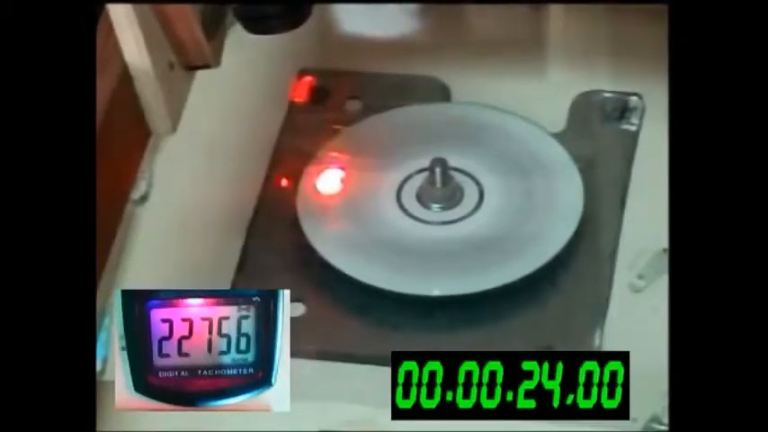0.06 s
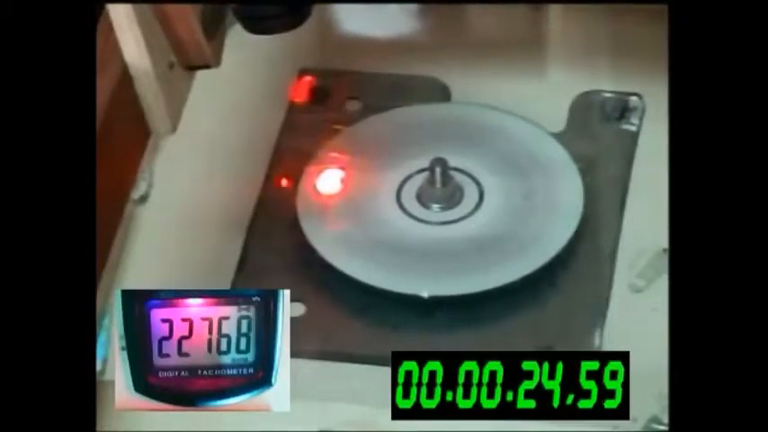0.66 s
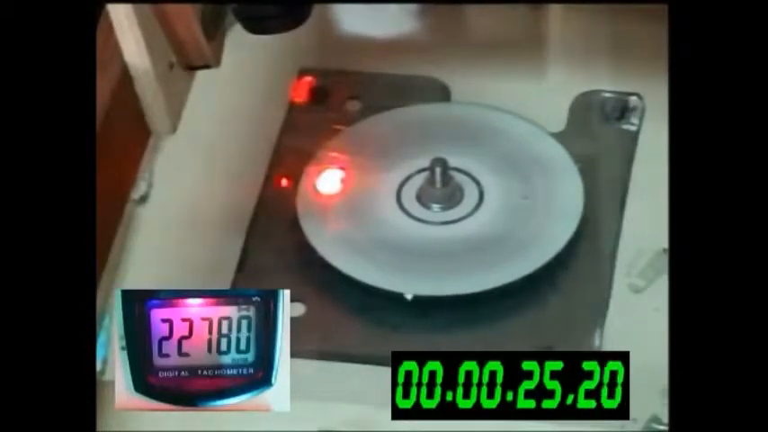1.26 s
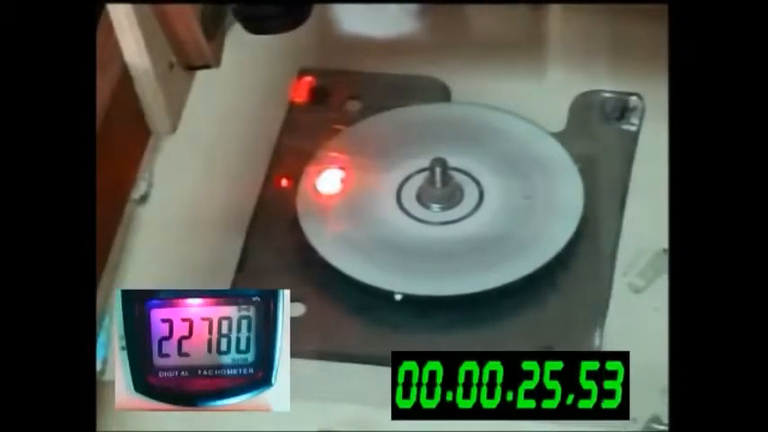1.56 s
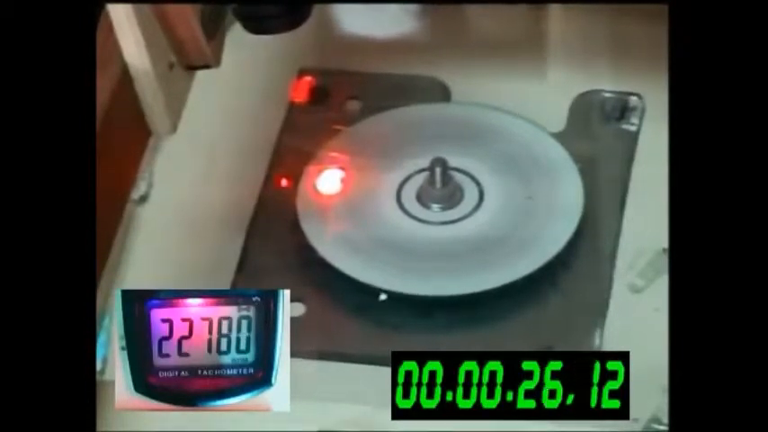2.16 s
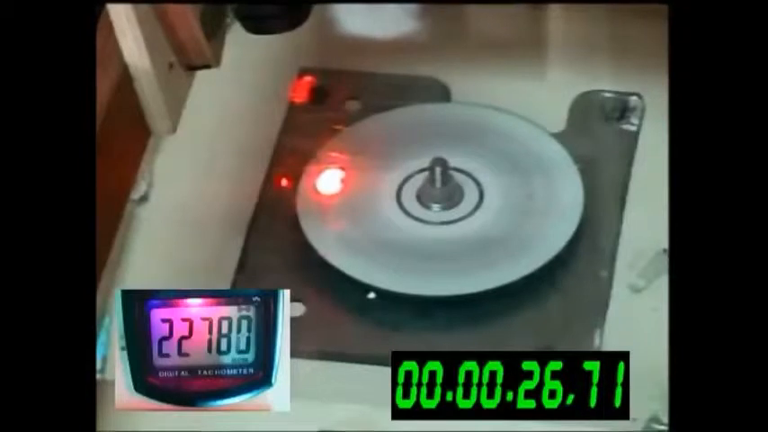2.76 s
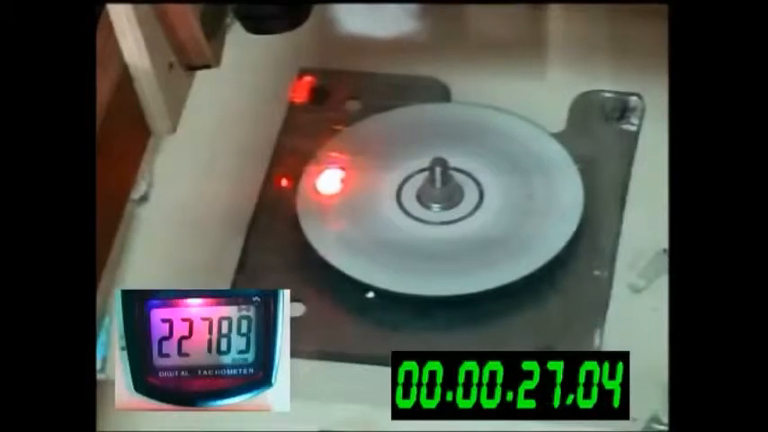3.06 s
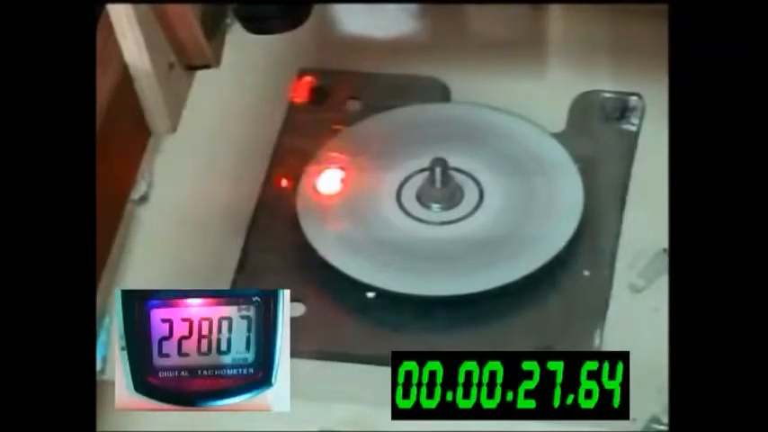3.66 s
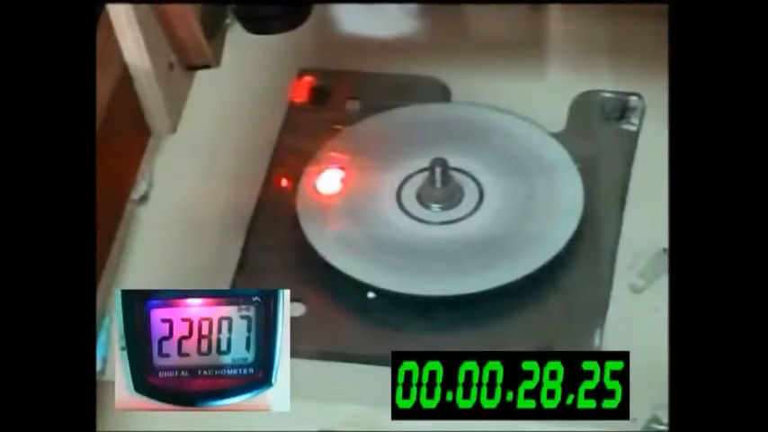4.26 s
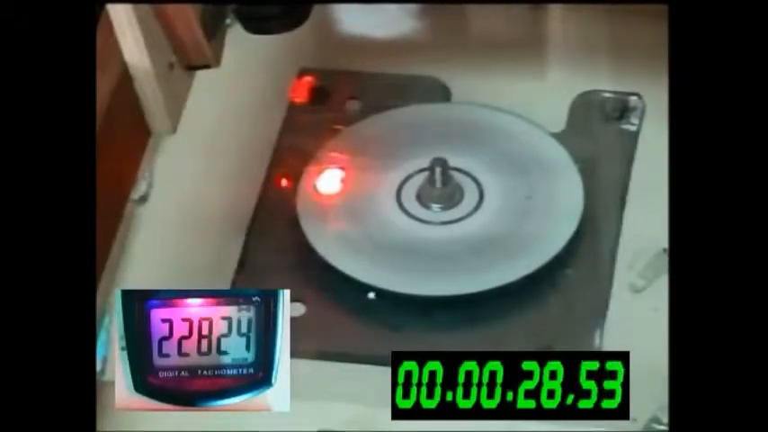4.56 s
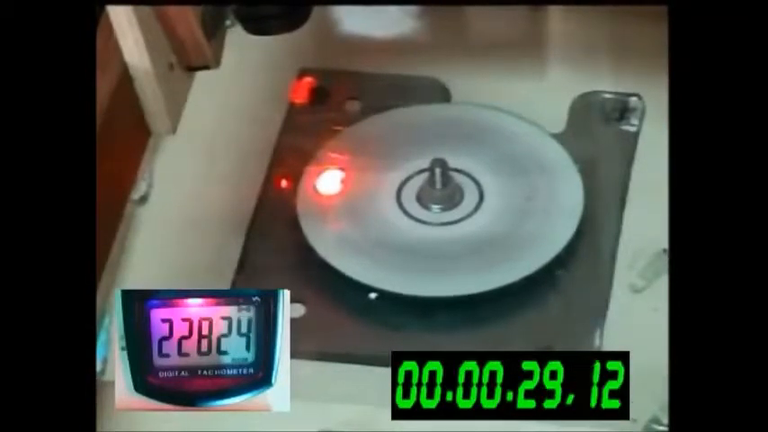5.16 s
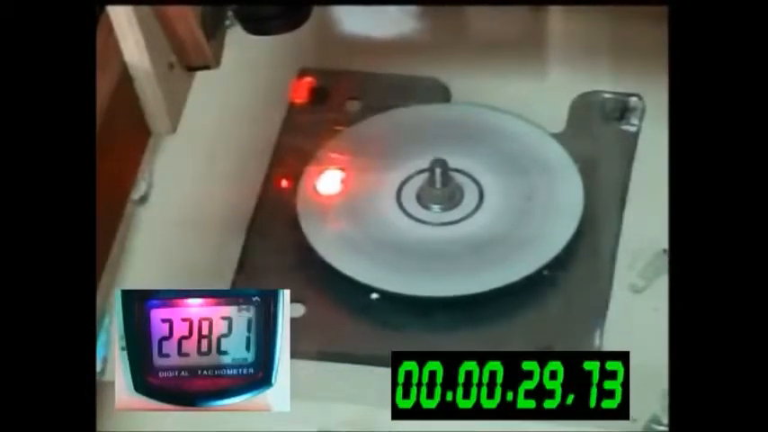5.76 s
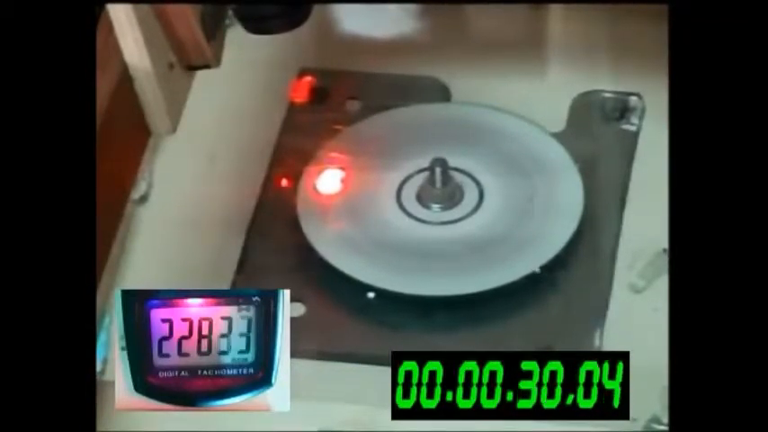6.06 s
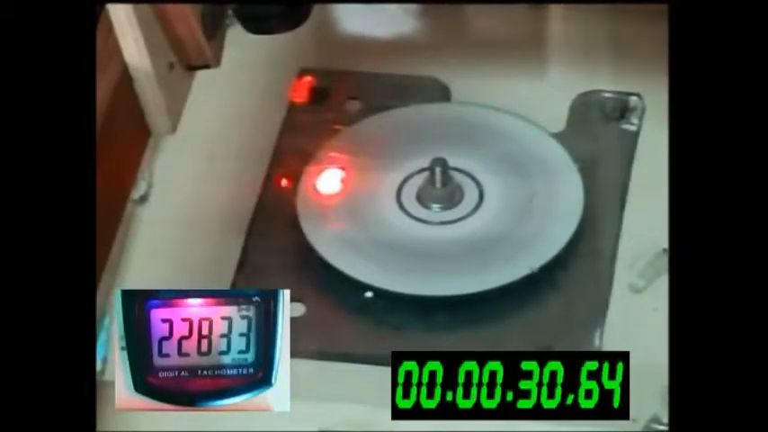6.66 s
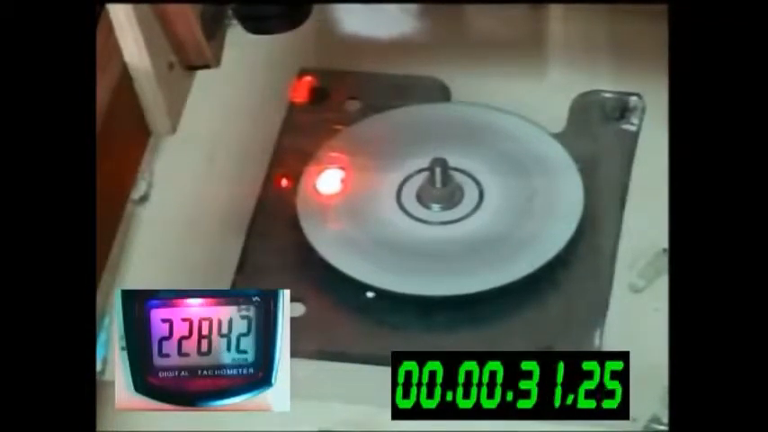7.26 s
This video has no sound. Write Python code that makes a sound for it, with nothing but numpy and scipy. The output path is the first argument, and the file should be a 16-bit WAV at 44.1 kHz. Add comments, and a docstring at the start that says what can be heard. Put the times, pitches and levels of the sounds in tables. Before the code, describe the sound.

A motor spins a disc at very high speed on a bench, making a bright, buzzing whine with an uneven rasp. A smooth hiss like rushing air runs behind it. The whine is already at speed and holds throughout, its pitch creeping up and its level easing almost imperceptibly. Three very faint low bumps pass in the middle. The sound is dry and mono, with the highest treble cut off.

```python
"""A dry, bright motor whine of sharp drive pulses, two a turn, over hiss, on a narrow-band recorder.
From the start the shaft runs at about 380 turns a second: the needle-sharp pulses fuse into a
tone, and their uneven strength makes it rasp. From 2.4 s the shaft creeps up in speed and the
level eases. Three faint low bumps pass between 2.8 and 5.4 s.
A last strong rasp comes near 7 s, with the motor still running."""
import sys
import numpy as np
from scipy import signal
from scipy.fft import rfft, irfft, next_fast_len
from scipy.io import wavfile
from scipy.ndimage import uniform_filter1d

SR = 44100
rng = np.random.default_rng(int(sys.argv[2]) if len(sys.argv) > 2 else 0)


def int16_out(signal):
    """Quantize to a 16-bit WAV file."""
    q = np.round(np.clip(np.atleast_2d(signal).T, -1, 1) * 32767)
    wavfile.write(sys.argv[1], SR, q.astype(np.int16))


N = 326781
TIME = np.arange(N) / SR

# A smooth, wide hiss behind the whine. Each row: frequency in Hz, relative level in dB.
HISS_SPECTRUM = [(80, -3), (300, -4), (700, -3.5), (1500, -1.5), (3000, 1.5), (6000, 1), (12500, -0.5)]
# Soft bumps under the whine. Each row: centre in seconds, pitch in Hz, level in dB.
LOW_BUMPS = [(2.76, 35, -36), (4.335, 33, -37), (5.38, 72, -38)]
# The shaft creeping up to speed. Each row: time in seconds, speed in turns per second.
SHAFT_SPEED = [(0.0, 379.2), (2.4, 379.48), (3.7, 380.3), (4.9, 380), (5.9, 380.1), (7.41, 380.6)]
# Runs of hard pulses, the strongest rasps. Each row: centre in seconds, added chance of a hard pulse.
RASP_RUNS = [(0.101, 0.32), (.445, .32), (0.959, .3), (1.2, .35), (2.06, .4), (2.769, 0.4), (3.081, 0.35),
             (3.386, .33), (4.849, 0.43), (5.06, 0.4), (6.95, 0.3)]
# What the recorder passes of the signal. Each row: frequency in Hz, gain in dB.
RECORDER_RESPONSE = [(30, -7.5), (62, -19.5), (92, 2), (1000, 2), (5000, -0.5), (6200, -0.5), (7000, -4),
                     (7900, -11), (8700, -17), (9600, -19.5), (11300, -21), (12600, -34)]
# Treble mirrored about half the recorder's sampling rate. Each row: frequency in Hz, gain in dB.
MIRROR_RESPONSE = [(8500, -29), (10000, -26.5), (11400, -28.5), (12200, -32), (12700, -31)]


def gain_of(db):
    """Decibels to amplitude."""
    return 10 ** (np.asarray(db) / 20)


def unit_rms(x):
    """Scales to rms 1."""
    return x / np.sqrt(np.mean(x ** 2) + 1e-20)


def coloured(x, spectrum):
    """Filters x by a spectrum of (Hz, dB) rows."""
    hz, db = np.transpose(spectrum)
    size = next_fast_len(N + 4096)
    bins_hz = np.fft.rfftfreq(size, 1 / SR)
    gain = gain_of(np.interp(np.log(bins_hz + 1), np.log(hz), db))
    return irfft(rfft(x, size) * gain, size)[:N]


def wander(rate_hz):
    """A slow random drift of rms 1 in the two octaves below rate_hz."""
    t = np.linspace(0, N / SR, 1000)
    rates_hz = rate_hz * np.logspace(-2, 0, 16, base=2)
    drift = sum(np.sin(2 * np.pi * (hz * t + rng.random())) for hz in rates_hz)
    return unit_rms(np.interp(TIME, t, drift))


def low_bumps(width_s=0.018):
    """Far down in the background, each bump is a few cycles of faint bass."""
    return sum(gain_of(db) * np.exp(-0.5 * ((TIME - s) / width_s) ** 2)
               * np.sin(2 * np.pi * hz * (TIME - s)) for s, hz, db in LOW_BUMPS)


def hiss(drive_db, base_db=-29):
    """A smooth, wide hiss behind the whine, swelling a little with the drive."""
    return gain_of(base_db + drive_db) * unit_rms(coloured(rng.standard_normal(N), HISS_SPECTRUM))


def pulse_strengths(pulse_s, turns, is_second, spread_db=1.24, hard_db=4.5, rasp_s=0.011):
    """Pulses scatter in strength; some land much harder, more often on the first half turn."""
    scatter, drift = rng.standard_normal((2, len(turns)))
    run_chance = sum(chance * np.exp(-0.5 * ((pulse_s - s) / rasp_s) ** 2) for s, chance in RASP_RUNS)
    is_hard = rng.random(len(turns)) < np.where(is_second, 0.095, 0.18) + run_chance
    pulse_db = np.where(is_hard, hard_db + 0.5 * spread_db * scatter, spread_db * scatter)
    pulse_db += 0.85 * (is_second + 0.5)  # the second pulse is a little stronger
    # neighbouring pulses flutter together
    flutter_db = 0.4 * unit_rms(uniform_filter1d(drift, size=22) - uniform_filter1d(drift, size=90))
    whirl = 1 + 0.036 * np.cos(np.pi * turns)  # the shaft whirls at half its speed
    mains_ripple = 0.043 * np.sin(2 * np.pi * 100 * pulse_s)
    balance = 1 + mains_ripple * (1 - 2 * is_second)  # the ripple rocks one pulse against the other
    return gain_of(pulse_db + flutter_db) * whirl * balance


def motor_whine(speed, drive_db, base_db=-24, jitter_s=13e-6, base_width_s=28e-6):
    """Two sharp drive pulses a turn; the second lags, more so at speed, adding the lines in between."""
    shaft_turns = np.cumsum(speed) / SR
    pulse = np.arange(int(2 * shaft_turns[-1]))
    turns, is_second = pulse / 2, pulse % 2
    lag_turns = 0.0112 + 0.0035 * (speed - speed[0]) + 0.0012 * wander(rate_hz=1.15)
    lagged_turns = turns + np.interp(turns, shaft_turns, lag_turns) * is_second
    pulse_s = np.interp(lagged_turns, shaft_turns, TIME) + jitter_s * rng.standard_normal(N)[pulse]
    strength = pulse_strengths(pulse_s, turns, is_second)[:, None]
    width_s = base_width_s * strength ** 0.26  # a hard pulse lasts longer and sounds duller
    samples = np.round(pulse_s * SR).astype(int)[:, None] + np.arange(-10, 11)
    spikes = strength * np.exp(-0.5 * ((samples / SR - pulse_s[:, None]) / width_s) ** 2)
    train = np.bincount(np.clip(samples, 0, N - 1).ravel(), spikes.ravel(), N)
    return gain_of(base_db + drive_db) * unit_rms(train - train.mean())


def scene(ease_db_per_hz=0.79):
    """Hiss and whine on one dry channel; both follow the drive, which eases as speed rises."""
    speed = np.interp(TIME, *np.transpose(SHAFT_SPEED))
    drive_db = 0.74 - ease_db_per_hz * (speed - speed[0]) + 0.24 * wander(rate_hz=3.0)
    return (hiss(drive_db) + motor_whine(speed, drive_db))[None]


def record(dry, clock_hz=15987, edge_hz=12800, dc_offset=-0.288):
    """A narrow-band recorder with a slow clock and an off-centre zero; the low bumps join here."""
    sound = coloured(dry[0], RECORDER_RESPONSE)
    images = 2 * np.cos(2 * np.pi * clock_hz * TIME) * sound
    mirror = coloured(images, MIRROR_RESPONSE)  # faint out-of-tune lines on top
    band_limit = signal.firwin(511, edge_hz, window=("kaiser", 9), fs=SR)
    return dc_offset + signal.oaconvolve(sound + mirror + low_bumps(), band_limit, "same")[None]


dry = scene()
out = record(dry)
int16_out(out)
```